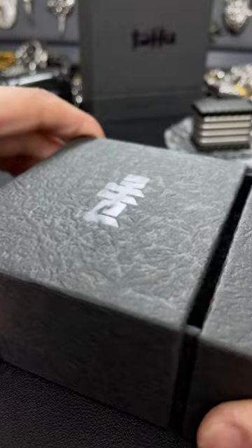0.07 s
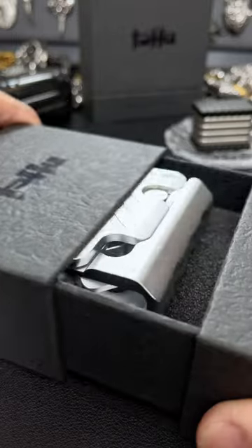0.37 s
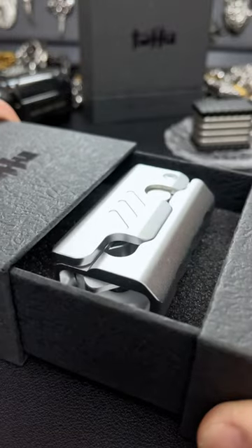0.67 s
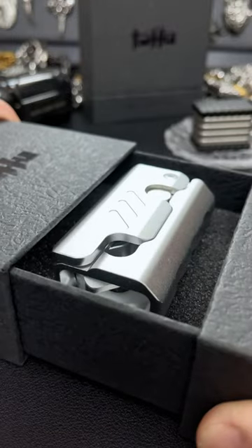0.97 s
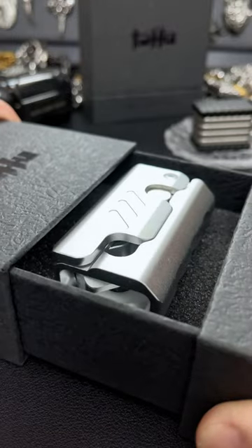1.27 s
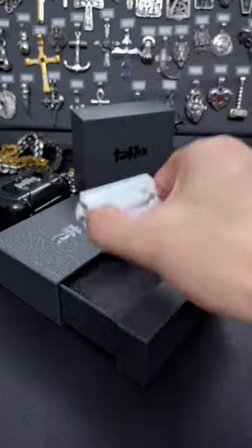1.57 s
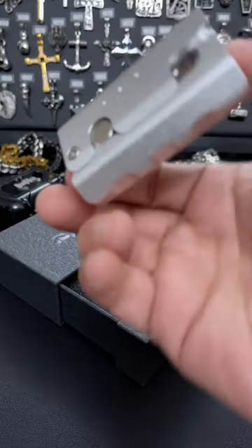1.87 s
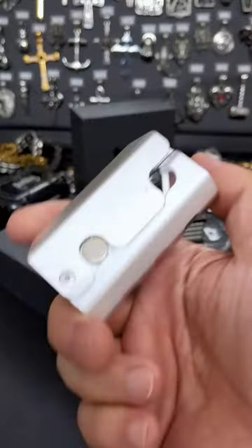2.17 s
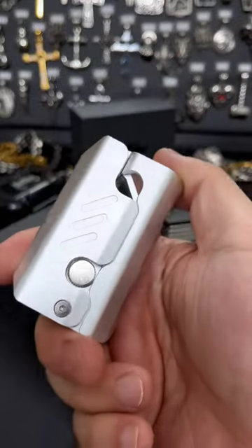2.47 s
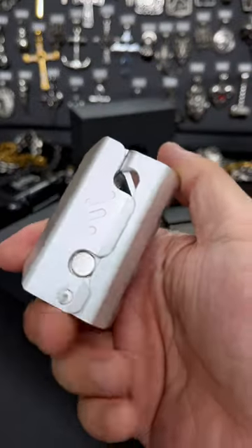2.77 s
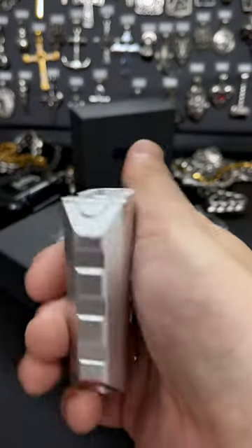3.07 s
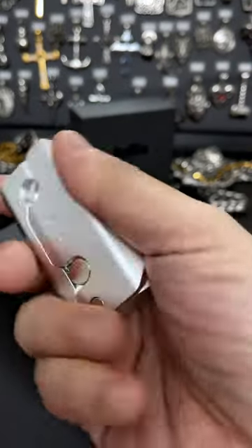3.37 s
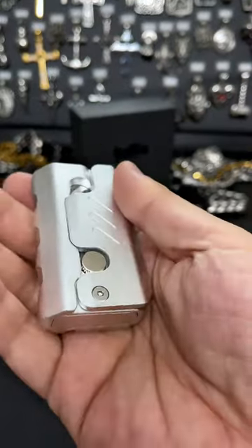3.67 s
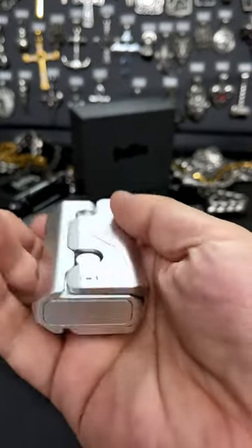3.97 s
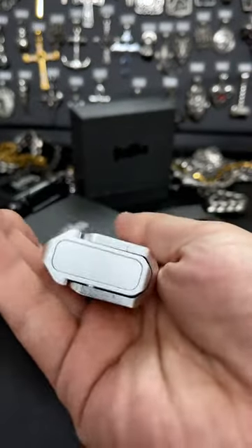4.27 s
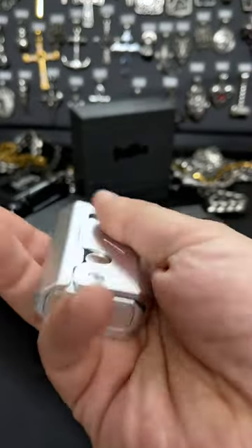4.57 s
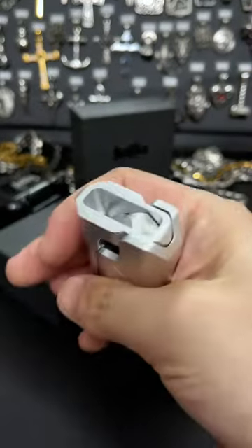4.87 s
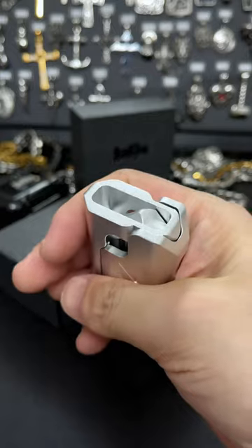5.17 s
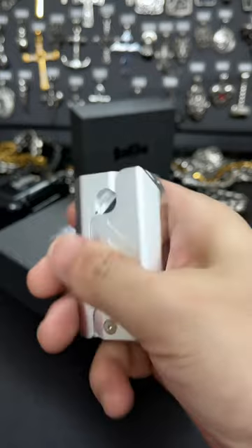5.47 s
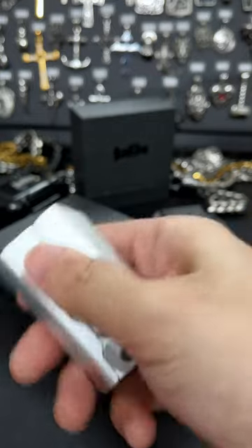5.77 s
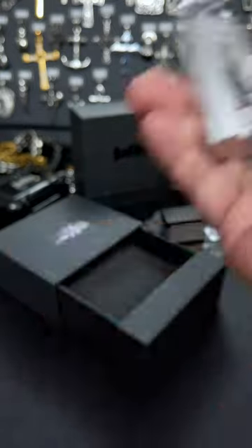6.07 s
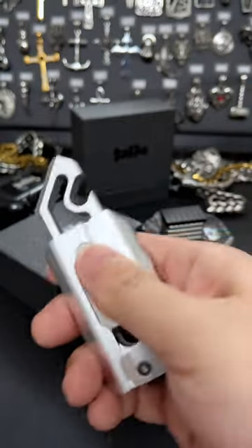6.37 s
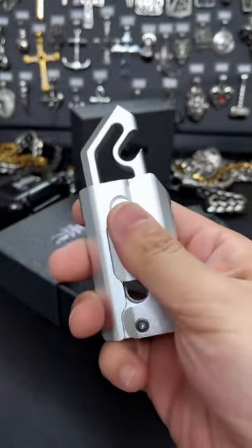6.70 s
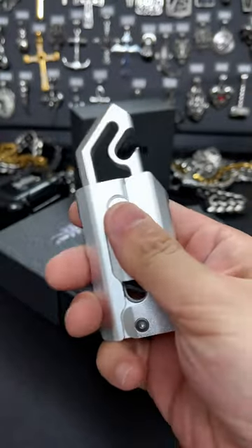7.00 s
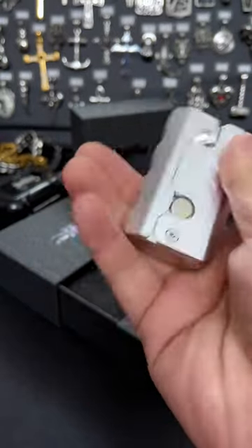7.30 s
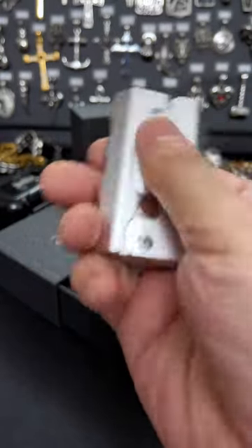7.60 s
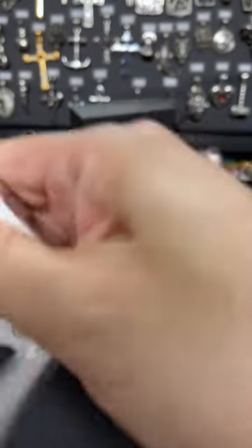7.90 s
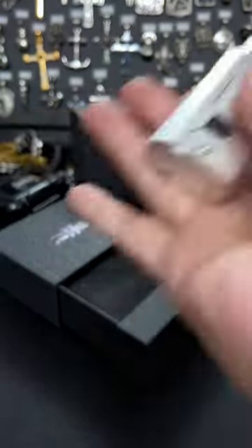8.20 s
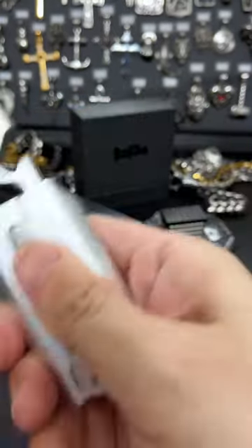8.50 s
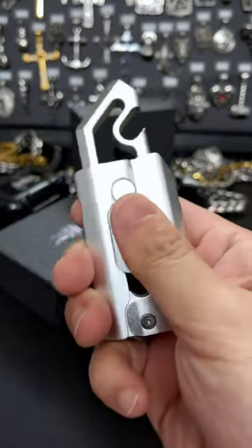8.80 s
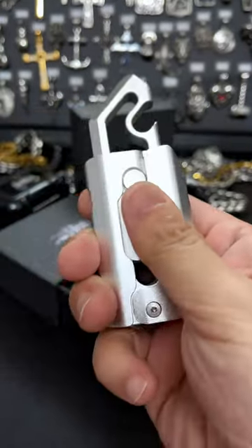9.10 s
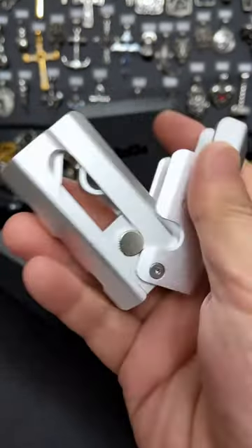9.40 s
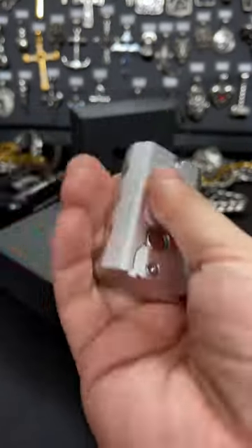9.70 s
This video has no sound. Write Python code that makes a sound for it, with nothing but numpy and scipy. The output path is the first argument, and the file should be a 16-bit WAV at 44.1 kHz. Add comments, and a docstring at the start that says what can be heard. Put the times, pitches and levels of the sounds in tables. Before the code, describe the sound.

A cardboard box slides open, then a small metal tool is flicked open and shut with sharp clicks, clacks and short scrapes.

```python
"""A cardboard drawer box slides open close by, a hollow rush of friction with a bright hiss on top. A metal
gravity bottle opener is lifted out and flicked open and shut: its parts clack against their stops, scrape along
their guides by stick-slip friction and ring on in their natural modes. Dull knocks reach the table and the box;
the stand of the listening phone is bumped once and quivers. A small hard room reverberates over a low rumble,
and a noise suppressor shortens the tails."""
import sys
import numpy as np
from scipy import signal
from scipy.fft import rfft, irfft, next_fast_len
from scipy.io import wavfile
from scipy.ndimage import uniform_filter1d, minimum_filter1d, map_coordinates

SR = 44100
rng = np.random.default_rng(int(sys.argv[2]) if len(sys.argv) > 2 else 0)


def persist_wave(psi):
    """Save psi, clipped to +-1, as 16-bit WAV."""
    counts = np.round(np.clip(psi, -1, 1) * 32767).astype(np.int16)
    wavfile.write(sys.argv[1], SR, np.atleast_2d(counts).T)


N = 434385
T = np.arange(SR // 4) / SR  # seconds since a blow


# Cover, catch and blade hit their stops. Each row: start in seconds, clack level in dB,
# treble in dB relative to the clack, pitch in Hz, rebound in dB relative to the first hit.
STOP_HITS = [(1.4765, -26, 4.5, 2860, 1.5), (1.5859, -24, 0.5, 2417, -18.5),
             (1.6613, -24.5, -1, 2910, -15.5), (1.8205, -22, 9, 3280, -7), (1.9037, -22, -1.5, 2810, -24),
             (1.9331, -19.5, -7, 2710, -25), (2.006, -22, -17, 2683, -21), (2.0482, -27, -5.5, 2740, -15.5),
             (2.1118, -13, -11.5, 2784, -1.5), (2.1164, -11.5, -1, 2887, -21.5),
             (2.1713, -20.5, 1.5, 2775, -13.5), (2.754, -15.5, -10.5, 2763, -25),
             (2.7925, -29, -0.5, 2530, 4.5), (2.8847, -11, -4, 2777, -12.5),
             (2.9517, -23.5, 8.5, 2464, -29), (2.9672, -13.5, 0, 2956, -33.5), (3.007, -28, 7.5, 2530, -20),
             (3.0496, -11, 1.5, 2625, -14), (3.137, -12.5, -1.5, 2540, -13.5),
             (3.2379, -7, -7, 2763, -24.5), (3.2788, -0.5, -5, 2930, -23), (3.3239, -5, 2.5, 2765, -35.5),
             (3.5635, -27, -7, 2800, -14.5), (3.9131, -35, 8.5, 2500, -21),
             (3.9223, -14.5, -2, 2610, -30.5), (4.0588, -12, -4, 2810, -15),
             (4.2734, -40.5, 20, 3740, -20.5), (4.4924, -37, -5, 3210, -24),
             (4.5496, -23.5, -4, 2690, -29.5), (4.581, -22.5, -0.5, 2650, -27),
             (4.6013, -31, -0.5, 2870, -5), (4.6148, -29, 13, 2990, -35), (4.6368, -17, 5.5, 2463, -8.5),
             (4.6715, -28, -10.5, 2343, -5), (4.7775, -24.5, 5, 2680, -3.5), (5.3121, -37, 1, 3030, -29.5),
             (5.403, -35, 4, 2630, -27.5), (5.4666, -24, 14.5, 2720, -11.5), (5.508, -16.5, -6, 2620, 3),
             (5.5857, -22, -5.5, 3365, -23.5), (5.7405, -20, -2, 2644, 3), (5.881, -1, -6, 2860, -24.5),
             (6.031, -21.5, 3.5, 3080, -20.5), (6.066, -15, 7.5, 2580, -3), (6.1078, -9.5, 12, 1870, -29),
             (6.2623, -16, 7, 3170, -25.5), (7.241, -7.5, 0, 2775, -22), (7.2928, -9.5, 7, 2546, -24),
             (7.4059, -11.5, 1.5, 2834, -20.5), (7.4859, -18, 7, 2616, -15),
             (7.6594, -30.5, -3, 2210, -31.5), (7.6891, -15, 5, 2417, -16),
             (7.758, -14.5, 2.5, 2515, -29.5), (7.829, -14.5, 11.5, 2560, -18.5),
             (7.9011, -9, 10, 2356, -3), (8.1612, -12, 9, 2574, -34), (8.178, -7.5, 12.5, 2503, -14),
             (8.198, -16.5, 3.5, 2210, -26.5), (8.318, -23.5, -3, 2810, -1.5), (9.1379, -26, -3, 2820, -30),
             (9.207, -8, 4.5, 2500, -12.5), (9.2323, -23, -0.5, 2660, -13), (9.349, -33, 27.5, 2760, -30.5),
             (9.498, -13, -12, 2890, -13), (9.5332, -7, 6.5, 2605, -23), (9.6409, -27.5, 8, 2230, -8.5),
             (9.6737, -38, 15, 2820, -11), (9.7542, -23.5, -9, 2530, -20), (9.8058, -23, -2.5, 2480, -23),
             (9.832, -10, -1.5, 2500, -40.5)]

def clicks(flight_s=.0098):
    """Elastic impact: a part hits its stop, rebounds and lands once more after a short flight."""
    out = np.zeros((2, N))
    for s, db, treble_db, pitch_hz, rebound_db in STOP_HITS:
        hit, lead_s = blow(pitch_hz, treble_db)
        add(out, s - lead_s, amp(db) * hit)
        add(out, s + flight_s, amp(db + rebound_db) * contact(pitch_hz, treble_db))
    return out


def blow(pitch_hz, treble_db, graze_db=-16, lead_s=0.0068, chatter_s=0.024):
    """Contact chatter: light grazes surround the main impact. Returns the sound and its head start."""
    hit = np.zeros((2, SR // 10))
    add(hit, lead_s, contact(pitch_hz, treble_db))
    train = catches(chatter_s, count=7, spread_db=3.0)
    grazes = signal.fftconvolve(train, contact(pitch_hz, treble_db), axes=1)
    add(hit, 0, amp(graze_db) * grazes)
    return hit, lead_s


# Modes of the hand-damped body. Each row: multiple of the clack pitch, relative level in dB,
# 60 dB decay time in seconds for a clack pitched at firm_hz.
BODY_MODES = [(.71, -8, 0.016), (1, 9.5, 0.015), (1.09, 0, .024), (1.36, -1, 0.0086)]
# The crack of a contact. Each row: frequency in Hz, relative spectral density in dB.
CRACK_SPECTRUM = [(200, -15.5), (700, -24), (1500, -8), (3000, 1), (4600, 5.5), (6100, -4.5), (7700, 11),
                  (9000, 4.5), (10500, -7), (12300, 7.5), (14000, -6.5), (15800, -32)]

def contact(pitch_hz, treble_db, firm_hz=2750, clack_rise_s=0.00026, crack_rise_s=0.00087, size=1600):
    """An impact excites damped modes and a broadband crack; loose, low-pitched contacts die sooner."""
    t = T[:size]
    modes = [(ratio, db, t60 * (pitch_hz / firm_hz) ** 1.5) for ratio, db, t60 in BODY_MODES]
    clack = ring(modes, scatter_db=2, scale=pitch_hz, t=t)
    clack = struck(clack * (1 - np.exp(-t / clack_rise_s)))
    crack = noise(CRACK_SPECTRUM, apart=.2, size=size) * amp(-60 * t / .009)
    crack = struck(crack * (1 - np.exp(-t / crack_rise_s)))
    sound = panned(-4 + 2 * rng.normal()) * clack + amp(treble_db) * crack
    sound = left_early(sound, lead_s=.000019 * rng.normal())  # the tool moves between contacts
    # parts this small radiate little bass
    return signal.lfilter(*signal.butter(2, 550, "highpass", fs=SR), sound)


# Free modes of three parts. Each row: frequency in Hz, relative level in dB, 60 dB decay in seconds.
CASE_MODES = [(5205, -5, .28), (5240, -9, .28), (7760, -17, .22), (9570, -17, .18)]
BLADE_MODES = [(5440, -13, .18), (6545, 1, .28), (7650, -8, .18), (9590, -8, .18), (11450, -10, .2),
               (12260, -6, .15)]
COVER_MODES = [(3900, -2, .27), (4030, -2, .25), (4500, -14, .12)]
# Blows that leave the parts free to ring. Each row: start in seconds, case, blade and cover level in dB.
RINGING_BLOWS = [(1.476, -14.5, -55.5, -44), (1.586, -22.5, -57.5, -57), (1.82, -21, -45, -61),
                 (3.048, -6.5, -25.5, -45.5), (3.279, -53, -39.5, -45), (4.058, -32, -57, -54),
                 (4.271, -30, -74, -60.5), (4.637, -18, -57.5, -42.5), (5.464, -20.5, -25.5, -35.5),
                 (5.512, -51, -57.5, -18), (6.074, -10, -35.5, -56.5), (7.243, -16.5, -59, -61),
                 (7.869, -40.5, -14, -48.5), (8.175, -35, -28.5, -36.5), (8.808, -35.5, -67, -70),
                 (9.234, -12, -19.5, -52.5), (9.349, -14, -18.5, -53), (9.541, -14.5, -51.5, -37)]

def rings(flutter=.9, flutter_hz=80, grip_detune=.003):
    """Free vibration: the parts sing on, detuned by the grip and modulated by loose pieces buzzing."""
    out = np.zeros((2, N))
    parts = (CASE_MODES, BLADE_MODES, COVER_MODES)
    for s, *levels in RINGING_BLOWS:
        tuning = 1 + grip_detune * rng.normal()
        song = sum(amp(db) * ring(part, scatter_db=1, scale=tuning) for db, part in zip(levels, parts))
        white = rng.standard_normal((2, len(T)))
        buzz = unit(filtered(white, lambda hz: 1 / (1 + (hz / flutter_hz) ** 2)))
        add(out, s, song * (1 + flutter * buzz) / np.hypot(1, flutter))
    return out


# Parts slide in their guides. Each row: start in seconds, length in seconds, relative level in dB,
# treble in dB relative to the clack, pitch half-way in Hz.
SLIDES = [(1.833, 0.017, -13.5, -9.5, 2715), (2.015, .011, -14, -7.5, 2703), (2.881, .008, -21, 4.5, 2683),
          (3.016, .022, -17.5, 0.5, 2746), (3.048, .025, -28.5, 1.5, 2930), (3.118, .04, -19, -1, 2887),
          (3.205, 0.033, -20.5, -18.5, 2695), (3.286, .048, -20.5, -10.5, 2678),
          (4.636, .045, -23, 5.5, 2590), (5.464, 0.015, -20, 5, 2530), (5.508, 0.013, -17.5, 9.5, 2594),
          (5.862, 0.086, -24.5, -16.5, 3047), (5.924, .085, -12, -16, 3008), (6.005, .12, -30.5, 15, 2730),
          (7.076, .048, -11, -3.5, 2598), (7.12, 0.099, -16, -4, 2700), (7.208, 0.085, -20.5, -3, 2722),
          (7.844, .05, -16, 2.5, 2730), (8.171, .028, -31, 16.5, 2466), (8.213, .12, -32, 1.5, 2089),
          (9.176, 0.069, -14.5, -7, 2525), (9.227, 0.069, -13.5, -7, 2770), (9.308, 0.047, -16.5, 1, 2837),
          (9.462, 0.051, -16.5, -6.5, 2800)]

def scrapes(catches_per_s=1200, sing_db=-25, swell_db=6.5, glide=.08, grit=.025, step_s=.01):
    """Stick-slip friction: each catch is a tiny impact; a slide swells, rises in pitch and eases off."""
    out = np.zeros((2, N))
    for s, length, db, treble_db, pitch_hz in SLIDES:
        rasp = np.zeros((2, SR // 2))
        song = amp(treble_db + sing_db) * ring(BLADE_MODES, scatter_db=2)
        steps = max(2, round(length / step_s))
        span_s = length / steps
        for k in range(steps):
            travel = (k + .5) / steps
            train = catches(span_s, count=round(span_s * catches_per_s) + 1, spread_db=2.5)
            train *= amp(swell_db * np.sin(np.pi * travel))
            tuning = 1 + glide * (travel - .5) + grit * rng.normal()
            clack = contact(pitch_hz * tuning, treble_db)
            for sound in (clack, song[None]):
                add(rasp, length * k / steps, signal.fftconvolve(train, sound, axes=1))
        gain = amp(db - 4.0) * np.hypot(1, amp(treble_db))
        add(out, s, gain * struck(rasp, size=round(length * SR)))
    return out


# The extended blade knocks in its slot. Each row: start in seconds, clack level in dB,
# treble in dB relative to the clack.
BLADE_KNOCKS = [(6.2441, -19.5, -6), (7.0279, -35.5, -5), (7.063, -28, 2.5), (8.2794, -26.5, -1.5),
                (8.3676, -27, -5), (8.4115, -25.5, -3.5), (8.4668, -28.5, 0.5), (8.541, -34, -16.5),
                (8.5764, -21, 5.5), (8.591, -22, -1), (8.6516, -26.5, -25), (8.705, -33.5, -32),
                (8.81, -22, -12.5), (8.9936, -27, -11)]
# The fingers turn the tool. Each row: start in seconds, length in seconds, tick level in dB, pitch in Hz.
TURNS = [(1.699, 0.05, -33.5, 2950), (2.815, .045, -28.5, 2180), (2.988, .012, -32.5, 2700),
         (3.571, .08, -37.5, 2430), (4.12, .03, -35, 2640), (5.038, 0.016, -49, 2440),
         (5.274, .1, -42.5, 2040), (6.408, .09, -42, 1934), (9.101, .06, -32.5, 1760)]

def rattles(loose_hz=1916, detune=.05, ticks_per_s=33):
    """Mechanical play: the loose blade knocks low and dull, and turning the tool sets off faint ticks."""
    out = np.zeros((2, N))
    for s, db, treble_db in BLADE_KNOCKS:
        knock, lead_s = blow(loose_hz * (1 + detune * rng.normal()), treble_db)
        add(out, s - lead_s, amp(db) * knock)
    for s, length, db, pitch_hz in TURNS:
        count = max(1, round(length * ticks_per_s))
        for k in range(count):
            tick = contact(pitch_hz * (1 + detune * rng.normal()), treble_db=-2.5)
            start = s + length * (k + rng.random()) / count
            add(out, start, amp(db + 1.5 * rng.normal()) * tick)
    return out


# The pull on the drawer. Each row: time in seconds, relative levels of rub and hiss in dB.
DRAWER_PULL = [(0.038, -19.5, -36.5), (0.074, -16.5, -26.5), (0.184, -18, -30), (0.226, -18, -34.5),
               (0.412, -18, -33), (0.51, -33, -41.5), (0.548, -37, -52.5), (0.63, -31.5, -44),
               (0.66, -72, -90)]
# Hollow rub and bright hiss. Each row: frequency in Hz, relative spectral density in dB.
RUB_SPECTRUM = [(40, -16), (120, -6.5), (260, -5.5), (400, -4), (570, 1.5), (740, -5.5), (970, 3),
                (1300, -12), (2100, -8.5), (2900, -15.5), (6000, -51.5)]
HISS_SPECTRUM = [(1200, -16), (2500, -6), (4300, 0), (6000, -14.5), (8000, -5), (10500, -22.5), (12600, -8),
                 (15500, -38)]
# The drawer catches. Each row: start in seconds, level in dB.
DRAWER_SNAGS = [(.176, -15), (0.632, -48)]

def drawer():
    """Friction noise: textured cardboard grips its sleeve unevenly, so rush and hiss waver together."""
    rub_db, hiss_db = curves(DRAWER_PULL)
    grip_db = .8 * wobble(45) + 1.2 * wobble(320)
    rub = amp(rub_db + grip_db - 1.5) * noise(RUB_SPECTRUM, apart=0.25)
    hiss = amp(hiss_db + 0.6 * grip_db + 2.0) * noise(HISS_SPECTRUM, apart=1.0)
    out = (rub + hiss) * during(DRAWER_PULL, fade_s=0.0018)
    for s, db in DRAWER_SNAGS:
        snag = noise(CRACK_SPECTRUM, apart=1.0, size=len(T)) * amp(-60 * T / 0.045)
        add(out, s, amp(db) * struck(snag))
    return out * panned(-3)


# Soft knocks on table and box. Each row: start in seconds, thud level in dB, thud pitch in Hz,
# relative level of the hollow cardboard in dB.
SOFT_KNOCKS = [(1.478, -27, 188, -13), (1.586, -32.5, 192, -35.5), (3.325, -44.5, 62.3, -40.5),
               (6.104, -30, 67.2, -33.5), (7.9, -31, 58.7, -19.5), (7.912, -32, 64.64, -18.5),
               (8.031, -34.5, 87.5, -63), (8.157, -30, 73.5, -37), (8.281, -42.5, 84.7, -54.5),
               (9.353, -42.5, 59, -41)]
# Table modes. Each row: multiple of the thud pitch, relative level in dB, 60 dB decay in seconds.
TABLE_MODES = [(1, 7.5, 0.16), (1.7, 4, 0.083), (3, -4, 0.056)]
# Modes of the empty box. Each row: frequency in Hz, relative level in dB, 60 dB decay in seconds.
BOX_MODES = [(273.3, -10, 0.078), (344, 2.5, 0.043), (465, -4.5, 0.13), (627, 2, 0.029), (1040, -6, .03)]

def knocks(rise_s=0.0018):
    """Soft impacts excite the low, well-damped modes of the table and the empty box."""
    out = np.zeros((2, N))
    for s, thud_db, thud_hz, hollow_db in SOFT_KNOCKS:
        thud = amp(thud_db) * ring(TABLE_MODES, scatter_db=2, scale=thud_hz) * (1 - np.exp(-T / rise_s))
        hollow = amp(hollow_db - 4) * ring(BOX_MODES, scatter_db=2)
        add(out, s, thud + hollow)
    return out


# The quiver of the stand dies away. Each row: time in seconds, relative level in dB.
STAND_DECAY = [(7.93, -37), (8.614, -48), (8.75, -87)]

def stand(natural_hz=47):
    """Damped oscillation: the bumped stand quivers at its natural frequency."""
    quiver = np.sin(2 * np.pi * natural_hz * np.arange(N) / SR)
    return amp(curves(STAND_DECAY)[0] + 4.0) * quiver * during(STAND_DECAY, fade_s=.03)


# Decay of the room. Each row: frequency in Hz, 60 dB reverberation time in seconds.
ROOM_DECAY = [(150, 0.16), (700, 0.37), (2700, 0.58), (5500, 0.75), (9000, 0.58), (15000, 0.42)]
# Colour of the reverberation. Each row: frequency in Hz, gain of the tail in dB.
ROOM_GAIN = [(150, 2), (700, -6.5), (2700, -10.5), (5500, -9.5), (9000, -19.5), (15000, -6.5)]

def room(x, build_s=0.0011, apart=0.96):
    """Diffuse reverberation: each frequency decays at its own rate, partly shared by both microphones."""
    hz, t, spectra = signal.stft(rng.standard_normal((2, SR * 3 // 4)), SR, nperseg=256)
    decay = amp(-60 * t / along(ROOM_DECAY, hz)[:, None])
    mid, side = signal.istft(spectra * decay, SR, nperseg=256)[1]
    tail = np.array([mid + apart * side, mid - apart * side])
    tail *= 1 - np.exp(-(np.arange(tail.shape[1]) / SR / build_s) ** 2)
    tail = filtered(tail / np.linalg.norm(tail[0]), lambda hz: amp(along(ROOM_GAIN, hz)))
    return signal.fftconvolve(x.mean(0)[None] / 2 + x / 2, tail, axes=1)[:, :N]


# The course of the rumble. Each row: time in seconds, level in dB.
RUMBLE_LEVEL = [(0.7, -41.5), (1.23, -42.5), (1.58, -38), (4.17, -59), (6.1, -49), (7.57, -62.5),
                (8.2, -50), (8.63, -51.5), (9.8, -57.5)]
# Rumble and air. Each row: frequency in Hz, relative spectral density in dB.
RUMBLE_SPECTRUM = [(15, -51), (30, -18), (48, 5.5), (70, -10.5), (104, 5.5), (146, 0.5), (204, -8),
                   (290, -16), (480, -27.5), (900, -60)]
AIR_SPECTRUM = [(300, 4.5), (1000, 0), (4000, -1), (8000, -13.5), (13000, -14), (15500, -32)]

def background():
    """Ambient noise: a low rumble wavers in amplitude under faint, steady air."""
    rumble_db = curves(RUMBLE_LEVEL)[0] + 2 * wobble(9)
    rumble = amp(rumble_db) * noise(RUMBLE_SPECTRUM, apart=0.15)
    return rumble + amp(-56.5) * noise(AIR_SPECTRUM, apart=1.0)


# The suppressor's threshold. Each row: frequency in Hz, level in dB below which a band is turned down.
GATE_THRESHOLD = [(150, -81.5), (600, -75), (2000, -69.5), (5000, -59.5), (9000, -71.5), (14000, -75.5)]

def suppressor(x, depth_db=-8):
    """Spectral gating: every band that has grown faint is turned down, which cuts the tails short."""
    hz, _, spectra = signal.stft(x, SR, nperseg=512)
    power = (np.abs(spectra) ** 2).mean(0)
    power = uniform_filter1d(power, size=5, axis=0)  # across frequency
    power = np.abs(uniform_filter1d(power, size=3, axis=1))  # across time
    passed = power / (power + amp(along(GATE_THRESHOLD, hz))[:, None] ** 2)
    return signal.istft(spectra * amp(depth_db * (1 - passed)), SR, nperseg=512)[1][:, :N]


def ring(modes, scatter_db, scale=1, t=T):
    """Modal superposition: damped sines, each struck with a fresh strength and sign."""
    return sum(rng.choice([-1, 1]) * amp(db + scatter_db * rng.normal() - 60 * t / t60)
               * np.sin(2 * np.pi * scale * hz * t) for hz, db, t60 in modes)


def catches(length_s, count, spread_db):
    """Shot noise: tiny impulses at random moments, with unit energy in all."""
    n = round(length_s * SR)
    moments = rng.integers(0, n, count)
    strengths = rng.choice([-1, 1], count) * amp(spread_db * rng.normal(size=count))
    train = np.bincount(moments, strengths, n)
    return train[None] / np.linalg.norm(train)


def noise(colour, apart, size=N):
    """Coloured stereo noise of rms 1; apart is the ratio of side to middle."""
    mid, side = filtered(rng.standard_normal((2, size)), lambda hz: amp(along(colour, hz)))
    return unit(np.array([mid + apart * side, mid - apart * side]))


def wobble(rate):
    """A smooth random curve, rate knots a second."""
    knots = rng.standard_normal(int(N * rate / SR) + 4)
    return map_coordinates(knots, [np.arange(N) * rate / SR])


def filtered(x, response):
    """Linear filtering: the spectrum of x times a complex response of frequency."""
    n = x.shape[-1]
    padded = next_fast_len(n + n // 8)
    return irfft(rfft(x, padded) * response(np.fft.rfftfreq(padded, 1 / SR)), padded)[..., :n]


def left_early(x, lead_s):
    """Path difference: the sound reaches the left microphone lead_s before the right."""
    return filtered(x, lambda hz: np.exp(1j * np.pi * hz * lead_s * np.array([[1], [-1]])))


def panned(db):
    """Left and right gains for a level difference."""
    return unit(amp([[db / 2], [-db / 2]]))


def amp(db):
    """Decibels to gain."""
    return 10 ** (np.asarray(db) / 20)


def unit(x):
    """Scale to rms 1."""
    return x / np.sqrt(np.mean(x ** 2) + 1e-20)


def struck(x, size=220):
    """Scale so that the first samples have rms 1."""
    return x / np.sqrt(np.mean(x[..., :size] ** 2) + 1e-20)


def along(points, hz):
    """Interpolate (Hz, value) points on a logarithmic frequency axis."""
    frequencies, values = np.transpose(points)
    return np.interp(np.log(hz + 1), np.log(frequencies), values)


def curves(rows):
    """One value per sample for each column after the time."""
    times, *columns = np.transpose(rows)
    return [np.interp(np.arange(N) / SR, times, column) for column in columns]


def during(rows, fade_s):
    """1 while a curve lasts, with short ramps to silence outside it."""
    start, end = rows[0][0], rows[-1][0]
    return np.interp(np.arange(N) / SR, [start - fade_s, start, end, end + fade_s], [0, 1, 1, 0])


def add(track, s, x):
    """Mix a sound in at s seconds."""
    part = track[:, round(s * SR):][:, :x.shape[-1]]
    part += x[..., :part.shape[1]]


def scene():
    """Superposition: close, direct sound, slightly earlier on the left, plus room and background."""
    near = clicks() + rattles() + scrapes() + rings() + drawer() + knocks() + stand()
    return left_early(near, lead_s=.000058) + room(near) + background()


def record(dry, ceiling=1.0, window=130, top_hz=15800):
    """Gating lowers faint sound, a fast limiter holds the peaks down, and a low-pass limits the band."""
    x = suppressor(dry)
    needed = np.minimum(1, ceiling / (np.abs(x).max(0) + 1e-9))
    gain = uniform_filter1d(minimum_filter1d(needed, window), window)
    return filtered(x * gain, lambda hz: hz < top_hz)


dry = scene()
out = record(dry)
persist_wave(out)
```